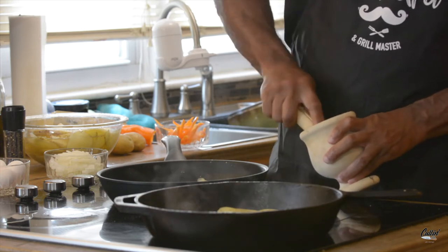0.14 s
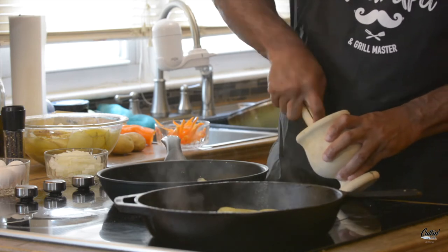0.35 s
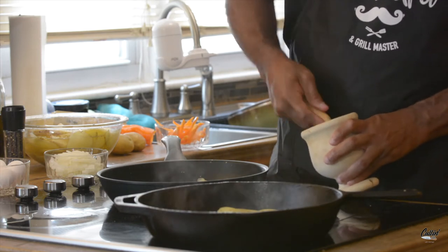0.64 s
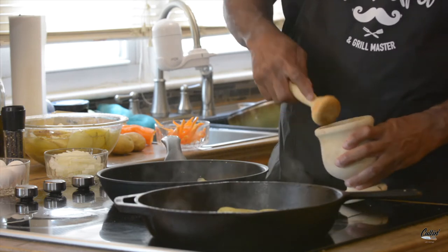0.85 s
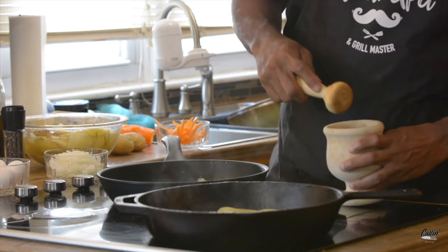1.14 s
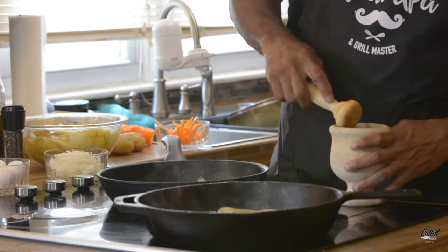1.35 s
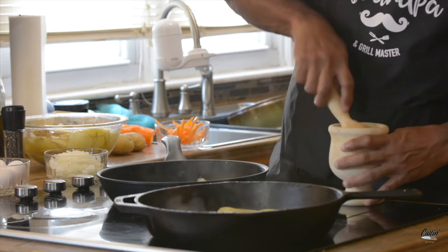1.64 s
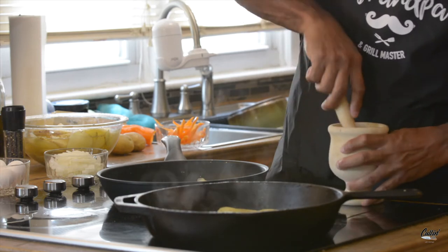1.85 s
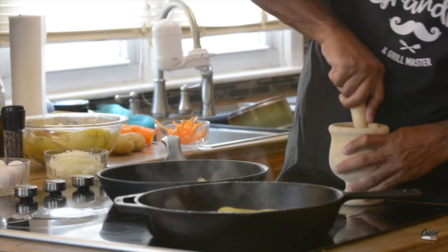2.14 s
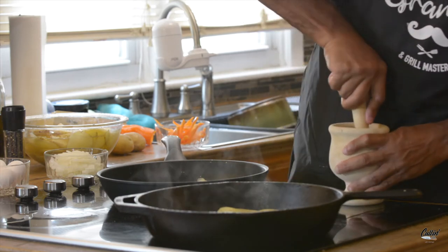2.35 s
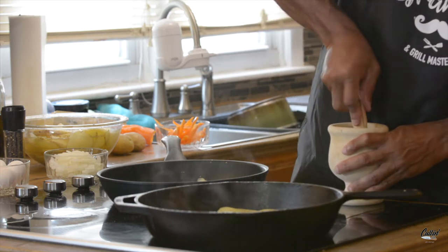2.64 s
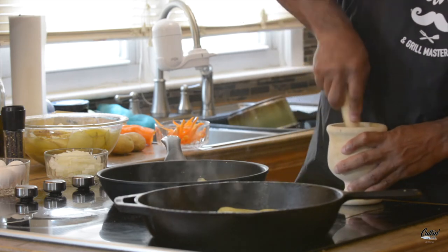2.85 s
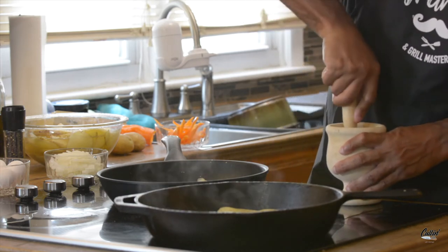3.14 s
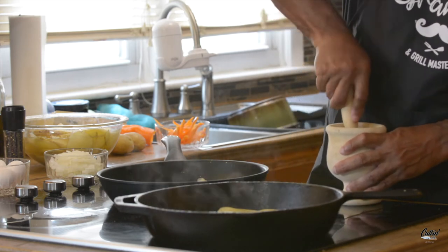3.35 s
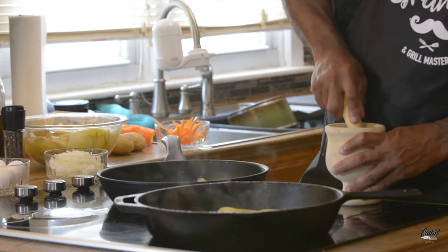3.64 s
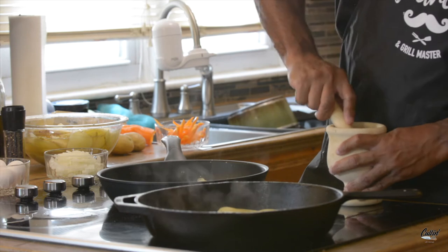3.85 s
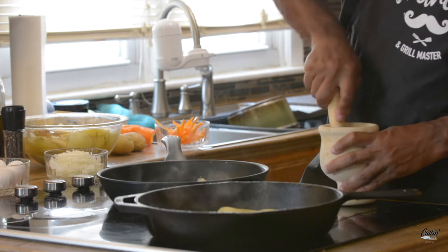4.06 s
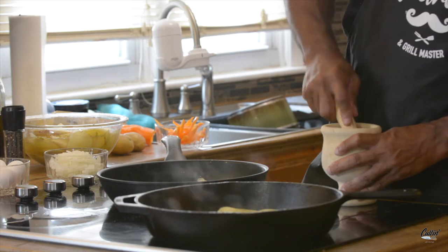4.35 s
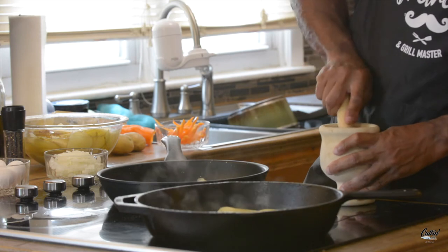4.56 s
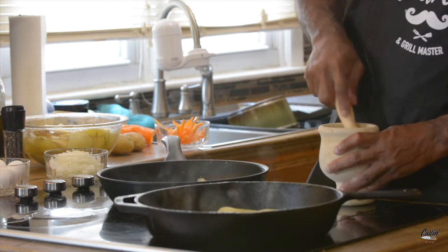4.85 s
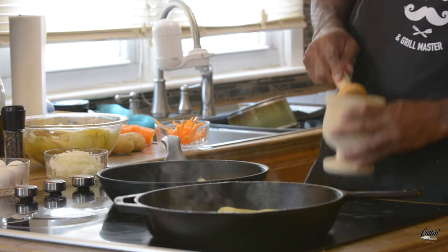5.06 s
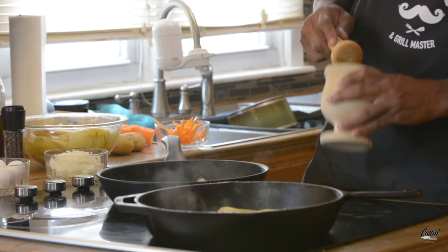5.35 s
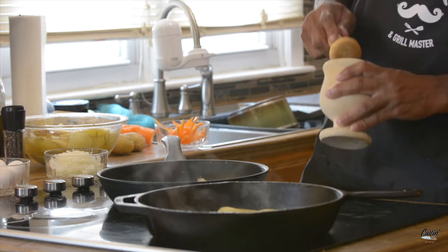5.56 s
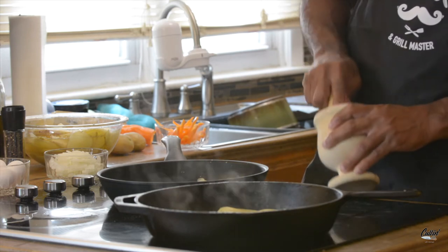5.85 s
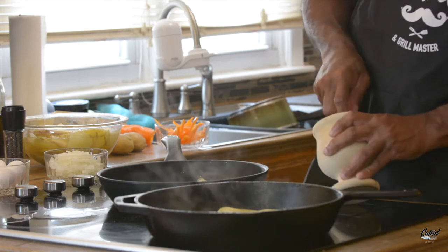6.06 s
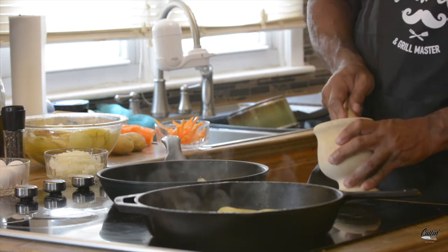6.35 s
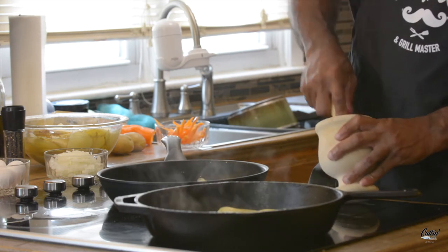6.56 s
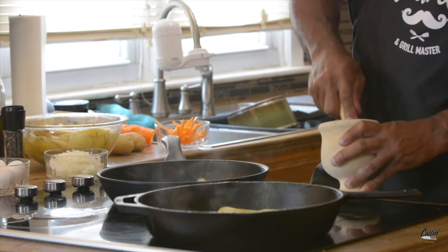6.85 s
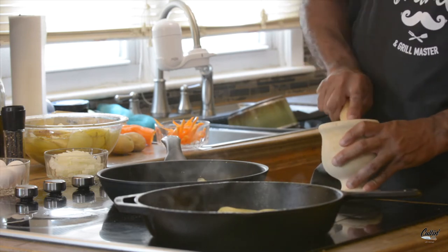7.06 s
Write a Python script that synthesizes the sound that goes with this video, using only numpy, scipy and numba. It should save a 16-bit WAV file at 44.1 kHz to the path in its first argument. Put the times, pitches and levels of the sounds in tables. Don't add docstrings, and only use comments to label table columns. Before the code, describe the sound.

A soft continuous sizzle of fat, flecked with small pops, fine spits and steam puffs, runs throughout over faint room hum. A loud bubble pops at 0.25 s, then a hollow wooden knock lands at 0.45 and a duller one at 1.2. Frying alone fills the gap until a rim tap at 2.46 and a strong knock at 2.66, with seeds cracking. A very hard, clipped knock hits at 3.16, with a lighter tap just after. Bubble pop at 3.44, faint drag at 3.76, knock at 3.95, softer one at 4.56. A sharp knock at 4.85 and bright rim taps at 5.08 scatter seed cracks. The heaviest, deepest thud overloads at 5.7, with cracks at 5.8. From 6 to 6.9 short low scrapes, clearest at 6.28, mix with pops and a knock at 6.69; a weak knock at 7.18 closes. Close microphone, short hard kitchen echo.

```python
import sys
import numpy as np
from scipy import signal
from scipy.fft import rfft, irfft
from scipy.io import wavfile
from scipy.ndimage import uniform_filter1d
from numba import njit

SR = 44100
rng = np.random.default_rng(int(sys.argv[2]) if len(sys.argv) > 2 else 0)


def boost_factor(decibels):
    exponent = np.asarray(decibels, float) / 20
    return 10 ** exponent


def generate_wav(signal):
    frames = np.transpose(np.atleast_2d(signal))
    scaled = np.clip(frames, -1, 1) * 32767
    pcm = np.round(scaled).astype(np.int16)
    wavfile.write(sys.argv[1], SR, pcm)


N = 317960

# pitch_hz, level_db
HUM_COLOUR = [(40, -39), (65, -37), (101, -12), (130, -9), (220, 8), (300, 3.5), (494, 2.5), (570, -13),
              (900, -13.5), (1400, -31)]
# delay_s, level_db
WALL_ECHOES = [
    (.0092, -10.5),
    (0.0131, -15.5),
    (0.019, -34),
    (.056, -23),
]
# time_s, level_db
FRYING_LEVEL = [(0.0, -45), (0.46, -46.5), (0.98, -47.5), (1.38, -46.5), (2.29, -49.5), (2.6, -47),
                (3.35, -45), (3.82, -47), (4.26, -45.5), (4.6, -47.5), (4.92, -45), (5.06, -50.5),
                (5.25, -46), (5.599, -47), (6.41, -44), (6.6, -47), (7.21, -45.5)]
# pitch_hz, level_db
SIZZLE_COLOUR = [(290, -8.5), (500, -6.5), (553, -4), (740, -6.5), (1080, 0.5), (1260, -1), (1380, 2),
                 (2100, 2), (3020, -2.5), (4090, -4.5), (6330, -21), (12300, -41), (14700, -55.5),
                 (16000, -50)]
# pitch_hz, level_db
CLICK_TONE = [(600, -16.5), (2000, -1.5), (4500, -2), (8000, -20), (15000, -27)]
# start_s, length_s, droplet_db, centre_hz, width_octaves
STEAM_PUFFS = [(0.172, 0.033, -46, 7060, 1.3), (0.55, 0.073, -33.5, 1800, .6),
               (0.665, 0.055, -56, 12400, .3), (0.817, 0.025, -57, 12000, .2),
               (0.94, 0.019, -58, 5000, 1.5), (1.452, 0.04, -35.5, 3040, 1.47),
               (1.724, .045, -37.5, 3350, 1.03), (1.711, 0.054, -62, 13000, 0.37),
               (1.874, 0.023, -36, 2700, 0.38), (2.756, 0.031, -54, 11000, .8),
               (3.702, .045, -46.5, 10000, 1.2), (3.703, 0.044, -35, 1580, 0.13),
               (3.789, 0.033, -56, 8650, 0.36), (4.016, 0.043, -39.5, 7500, 1.2),
               (5.567, 0.036, -44, 6850, 1.1), (6.135, 0.077, -52.5, 12000, 0.43),
               (6.45, 0.023, -50, 10800, 0.43), (6.531, 0.041, -56, 6960, 0.32),
               (6.978, 0.063, -49, 11100, 1.3), (7.002, 0.072, -33.5, 1960, 0.44)]
# start_s, peak_db, pitch_hz
FAT_SPITS = [(0.158, -42, 10250), (0.174, -32, 6200), (0.3247, -33.5, 6540), (0.813, -36, 9600),
             (0.934, -28, 6730), (1.411, -34.5, 7700), (2.0462, -39, 6200), (2.2216, -40, 6500),
             (2.3346, -38, 6440), (2.361, -39, 11100), (2.4853, -41, 13600), (2.7657, -39.5, 8500),
             (3.0773, -35.5, 9400), (3.1622, -26, 5900), (3.2799, -40, 6810), (3.3223, -39, 7600),
             (3.3398, -40, 11200), (4.01, -43, 6600), (4.6418, -40, 7500), (4.6836, -38, 6010),
             (4.922, -33.5, 5970), (5.593, -34, 6480), (5.7004, -33, 6700), (5.7994, -34.5, 6150),
             (6.4537, -38, 6500), (6.541, -33, 6900), (6.562, -36.5, 6440), (6.86, -32, 5600),
             (6.902, -26.5, 4670), (7.0572, -33.5, 6100)]
# start_s, peak_db, pitch_hz
BUBBLE_POPS = [(0.247, -16, 2100), (0.2948, -23.5, 2050), (0.5904, -27.5, 1560), (0.608, -28, 2020),
               (0.6935, -27.5, 2040), (0.8716, -31.5, 2020), (0.935, -26.5, 4650), (1.4501, -35, 2000),
               (1.5594, -33, 3350), (1.592, -25.5, 2090), (1.746, -24, 2700), (1.857, -30.5, 1680),
               (1.8679, -26, 2600), (2.171, -31, 3920), (2.361, -25.5, 2030), (2.9226, -27.5, 3210),
               (3.0762, -30.5, 2030), (3.4388, -18.5, 2050), (3.551, -32, 2140), (3.835, -32.5, 2080),
               (3.8714, -28.5, 2040), (4.357, -30, 3930), (4.7263, -31, 2085), (5.3438, -32, 4100),
               (5.4143, -30.5, 2140), (6.1499, -29.5, 2000), (6.3611, -19, 2270), (6.4542, -26, 2360),
               (6.9034, -21, 2290), (7.023, -29, 1980)]
# start_s, peak_db, pitch_hz
SEED_CRACKS = [(0.4703, -39, 1600), (0.4863, -32, 2180), (0.4965, -27.5, 2650), (2.4582, -22, 1420),
               (2.505, -21, 1960), (2.6585, -17, 1460), (2.7356, -29.5, 2210), (2.7578, -25, 2220),
               (3.2432, -20.5, 1380), (3.278, -29.5, 2310), (3.3236, -30, 1960), (4.043, -21, 2310),
               (4.0616, -23, 1360), (4.643, -26, 2220), (4.6616, -29.5, 2050), (4.8891, -19.5, 2130),
               (4.923, -21.5, 2200), (4.946, -28.5, 2250), (5.0753, -14.5, 1590), (5.117, -21, 1600),
               (5.149, -14.5, 2085), (5.2144, -16.5, 2200), (5.6595, -24.5, 2180), (5.801, -13, 2076),
               (5.813, -18, 4160), (5.9639, -24, 2470), (6.0066, -27.5, 2040), (7.166, -24, 1480)]
# pitch_hz, level_db, fade_by_60_db_s
COUNTER_NOTES = [(165, -49, .09), (233.4, -9.5, 0.16), (282, 1, 0.075), (357, 9.5, 0.043),
                 (381, -6.5, 0.054), (481.4, -2.5, 0.11), (631, -12.5, 0.11), (726, -13, 0.11)]
# start_s, length_s, level_db
MORTAR_RUBS = [
    (3.756, 0.14, -44.5),
    (5.978, 0.037, -39),
    (6.07, 0.0088, -37.5),
    (6.2, 0.041, -46),
    (6.278, 0.085, -31),
    (6.548, 0.049, -43.5),
    (6.858, 0.041, -46),
]
# peak_s, cup_peak_db, cup_pitch_hz, counter_peak_db
FLOOR_BLOWS = [(0.4518, -8.5, 883, -18.5), (1.2005, -16.5, 790, -17), (2.6606, -2.5, 1040, -23.5),
               (2.7164, -22, 846, -55), (3.148, -21, 950, -42), (3.152, -20, 1070, -46),
               (3.1565, -25, 1000, -53), (3.164, 2, 1150, -12.5), (3.1658, 2, 900, -13.5),
               (3.5641, -42, 860, -29), (3.8009, -32, 650, -49), (3.9472, -10.5, 890, -17),
               (4.2975, -47, 950, -39.5), (4.562, -25.5, 714, -19.5), (4.8522, -4.5, 865, -54),
               (4.8961, -16.5, 860, -55), (5.6774, -18, 940, -40), (5.7014, 2.5, 696, 1),
               (5.9845, -40, 910, -31.5), (6.018, -37, 800, -25), (6.0716, -44, 760, -25),
               (6.2066, -34, 785, -31), (6.2784, -39, 1100, -29), (6.5861, -28.5, 560, -21.5),
               (6.6941, -13, 760, -17.5), (7.1798, -23, 610, -20.5)]
# peak_s, cup_peak_db, cup_pitch_hz, counter_peak_db
RIM_TAPS = [
    (2.4598, -8.5, 1440, -64),
    (3.163, -4, 1590, -21),
    (3.2207, -12.5, 1250, -30),
    (4.0637, -27, 1800, -39),
    (5.0764, -5, 1570, -46),
    (5.0844, -10, 1760, -54),
    (5.7007, -8.5, 1460, -33),
]


def level(x, db):
    return x * boost_factor(db) / np.sqrt(np.mean(x ** 2))


def colour(x, table):
    hz, db = np.transpose(table)
    f = np.arange(N // 2 + 1) * SR / N
    gain = boost_factor(np.interp(np.log(f + 1), np.log(hz), db))
    cepstrum = irfft(np.log(gain), N)
    cepstrum[1:N // 2] *= 2
    cepstrum[N // 2 + 1:] = 0
    return irfft(rfft(x) * np.exp(rfft(cepstrum)), N)


def track(s, db):
    return boost_factor(np.interp(np.arange(N) / SR, s, db))


@njit
def grains(s, hz, cycles, size, power):
    y = np.zeros(N)
    for k in range(len(s)):
        start = int(s[k] * SR)
        rise = cycles[k] / hz[k] * SR
        for i in range(min(int(6 * rise) + 1, N - start)):
            u = i / rise
            swell = (u * np.exp(1 - u)) ** power
            y[start + i] += size[k] * swell * np.sin(2 * np.pi * cycles[k] * u)
    return y


def room_hum():
    return level(colour(rng.standard_normal(N), HUM_COLOUR), -59)


def kitchen(x, walls):
    fade_s, tail_db, dull_hz = 0.18, -8.5, 2630
    t = np.arange(SR // 2) / SR
    noise = rng.standard_normal(len(t))
    dull = signal.lfilter(*signal.butter(1, dull_hz, fs=SR), noise)
    tail = dull * boost_factor(-60 * t / fade_s) + .5 * noise * boost_factor(-60 * t / 0.38)
    tail *= np.clip(t / 0.0031 - .4, 0, 1)
    tail *= boost_factor(tail_db) / np.sqrt(np.sum(tail ** 2))
    for s, db in walls:
        tail[int(s * SR)] += boost_factor(db)
    return signal.fftconvolve(x, tail)[:N]


def fizz(count, lo_hz, hi_hz, scatter_db, most_db, ring_s):
    when, pitch, size, long = rng.random((count, 4)).T
    hz = lo_hz * (hi_hz / lo_hz) ** pitch
    size_db = np.minimum(-scatter_db * np.log(size), most_db)
    return level(grains(when * N / SR, hz, 0.37 + hz * ring_s * long, boost_factor(size_db), 2.0), 0)


def frying():
    fine_db, wander_db, changes_per_s = -17, 2.5, 5.5
    s, body_db = np.transpose(FRYING_LEVEL)
    steps = rng.standard_normal(99)
    wander = track(np.arange(len(steps)) / changes_per_s, fine_db + wander_db * steps)

    bubbles = fizz(count=9000, lo_hz=691, hi_hz=14900, scatter_db=2.0, most_db=11.5, ring_s=0.0012)
    bubbles = level(colour(bubbles, [(500, -14.0), (16000, 6.5)]), -1.1)

    hit, size, smear = rng.random((3, N))
    snaps = (hit < 250 / SR) * boost_factor(np.minimum(-4 * np.log(size), 14))
    snaps = level(signal.lfilter([1], [1, -.93], snaps) * (smear - .5), -3.5)

    flecks = boost_factor(-6.5) * fizz(count=900, lo_hz=5000, hi_hz=14960, scatter_db=2.0, most_db=25.0, ring_s=0.0013)
    hiss = level(rng.standard_normal(N), -0.77)
    whole = colour(bubbles + snaps + flecks + hiss, SIZZLE_COLOUR)
    body = signal.sosfiltfilt(signal.butter(3, 5500, fs=SR, output="sos"), whole)
    fine = level(whole - body, 0) * wander
    return (level(body, 0.086) + fine) * track(s, body_db)


def clicks():
    clicks_per_s, click_db, scatter_db = 44, -31, 4
    skin_db = -11
    hit, size, sign = rng.random((3, N))
    train = (hit < clicks_per_s / SR) * boost_factor(click_db + np.minimum(-scatter_db * np.log(size), 13))
    s, db, _ = np.transpose(BUBBLE_POPS + SEED_CRACKS)
    at = (s * SR).astype(int)
    train[at] = boost_factor(db + skin_db - 8 * size[at])
    return colour(train * np.sign(sign - .5), CLICK_TONE)


def puffs():
    s, length, db, hz, octaves = np.repeat(np.array(STEAM_PUFFS), 90, axis=0).T
    when, low, high, size = rng.random((len(s), 4)).T
    drop_s = s + 1.25 * length * when ** 1.3
    drop_hz = np.clip(hz * 2 ** (octaves * 1.06 * (low + high - 1)), 500, 15300)
    size_db = np.minimum(-2.6 * np.log(size), 11)
    drop_size = boost_factor(db - 12 + size_db - 5.8 * when) * hz / drop_hz
    return grains(drop_s, drop_hz, drop_hz * 0.00063, drop_size, 1.05)


def scattered(count, top_db, range_db, hz, octaves):
    when, size, a, b = rng.random((count, 4)).T
    s = (np.arange(count) + when) / count * (N / SR - .05)
    pitch_hz = np.minimum(hz * 2 ** (octaves * 2.45 * (a + b - 1)), 14500)
    return list(zip(s, top_db - range_db * size, pitch_hz))


def bursts(rows, spray_db, swell_s, spray_s):
    s, db, hz = np.transpose(rows)
    chance = rng.random((len(s), 28)).T
    swell = swell_s * (0.85 + 0.25 * chance[0])
    out = grains(s + .0004, hz, hz * swell, boost_factor(db), 0.79)
    for ratio, luck in ((1.65, chance[1]), (2.3, chance[2]), (3.1, chance[3])):
        size = boost_factor(db - 9.8 * ratio - 13.0 * luck) * (hz * ratio < 15000)
        out += grains(s + 0.00027, hz * ratio, hz * ratio * swell, size, 0.35)
    out += grains(s + 0.001012, hz, hz * 0.0036, boost_factor(db - 16.5 - 28 * chance[1]), 0.73)
    for gap, pitch in chance[4:].reshape(12, 2, -1):
        drop_s = s + 0.000963 + spray_s * gap
        drop_hz = np.clip(hz * (0.85 + .26 * pitch), 500, 15000)
        out += grains(drop_s, drop_hz, drop_hz * swell, boost_factor(db + spray_db - 23 * gap), 4.6)
    return out


def pops_and_seeds():
    small = scattered(count=60, top_db=-29.5, range_db=15.5, hz=2153, octaves=0.1)
    return bursts(SEED_CRACKS + BUBBLE_POPS + small, spray_db=-4.5, swell_s=0.00057, spray_s=0.023)


def spits():
    small = scattered(count=110, top_db=-43.5, range_db=11.5, hz=9500, octaves=0.3)
    return bursts(FAT_SPITS + small, spray_db=-5.5, swell_s=0.00032, spray_s=0.021)


def counter(push):
    t = np.arange(SR // 4) / SR
    ring = sum(boost_factor(db - 60 * t / fade_s) * np.sin(2 * np.pi * hz * t) for hz, db, fade_s in COUNTER_NOTES)
    ring = signal.sosfilt(signal.butter(4, 160, "high", fs=SR, output="sos"), ring)
    return signal.fftconvolve(push, ring / np.abs(ring).max())[:N]


def rubs():
    attack_db_per_s, release_db_per_s = 700, 450
    hit, size = rng.random((2, N))
    jerks = (hit < 600 / SR) * (size - .5) * boost_factor(-5 * np.log(size)).clip(0, 4)
    band = signal.butter(2, [210, 600], "band", fs=SR, output="sos")
    jerks = signal.sosfilt(band, counter(jerks))
    t = np.arange(N) / SR
    gain = np.zeros(N)
    for s, length, db in MORTAR_RUBS:
        before = np.maximum(s - t, 0)
        after = np.maximum(t - s - length, 0)
        gain += boost_factor(db - attack_db_per_s * before - release_db_per_s * after)
    return level(jerks, -5.0) * gain


def knocks():
    blow_cycles, blow_echo_db = 1.69, -6
    tap_cycles, tap_echo_db = 1.27, -0.5
    counter_lag_s = .001
    s, db, hz, low_db = np.transpose(FLOOR_BLOWS + RIM_TAPS)
    tap = np.arange(len(s)) >= len(FLOOR_BLOWS)
    cycles = np.where(tap, tap_cycles, blow_cycles)
    both = []
    for extra_db in (0 * db, np.where(tap, tap_echo_db, blow_echo_db)):
        cup = grains(s - cycles / hz, hz, cycles, boost_factor(db + extra_db), 5.2)
        push = np.zeros(N)
        push[((s + counter_lag_s) * SR).astype(int)] = boost_factor(low_db + extra_db + 3.5)
        both.append(cup + counter(uniform_filter1d(push, size=40)))
    return both


def scene():
    direct, to_walls = knocks()
    fat = pops_and_seeds() + puffs() + spits()
    near = rubs() + frying()
    echo = kitchen(to_walls, WALL_ECHOES) + kitchen(boost_factor(-6.0) * fat + boost_factor(-9.5) * near, [])
    return (room_hum() + echo + near + clicks() + fat + direct)[None]


def low_pass(x):
    return signal.sosfilt(signal.butter(12, 16380, fs=SR, output="sos"), x)


def record(dry):
    cut = signal.sosfilt(signal.butter(8, 100, "high", fs=SR, output="sos"), dry)
    cut = signal.sosfilt(signal.butter(12, 15000, fs=SR, output="sos"), cut)
    return low_pass(np.clip(cut, -1, 1))


dry = scene()
out = record(dry)
generate_wav(out)
```